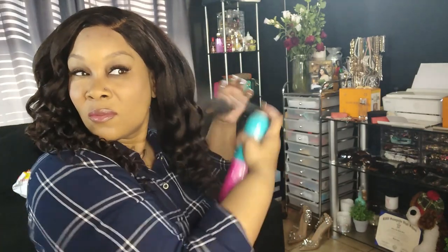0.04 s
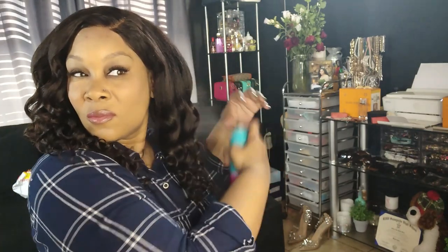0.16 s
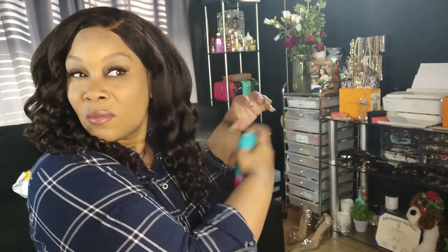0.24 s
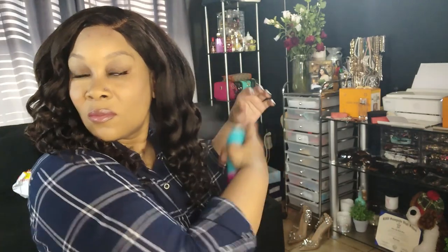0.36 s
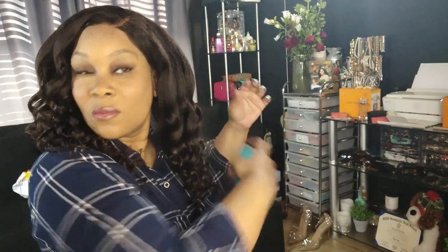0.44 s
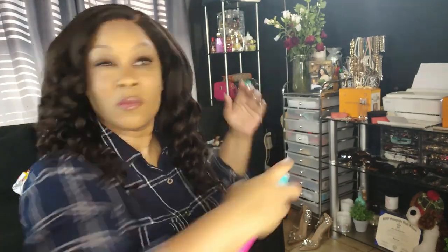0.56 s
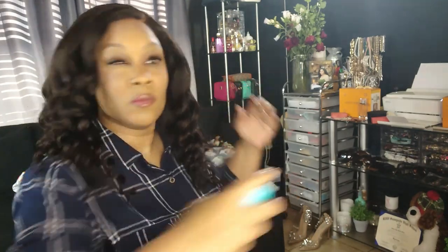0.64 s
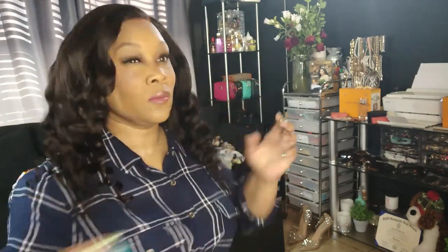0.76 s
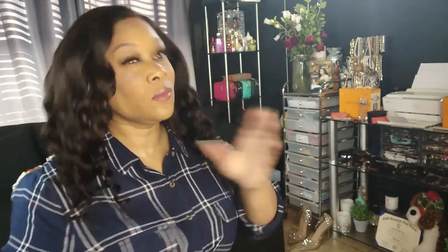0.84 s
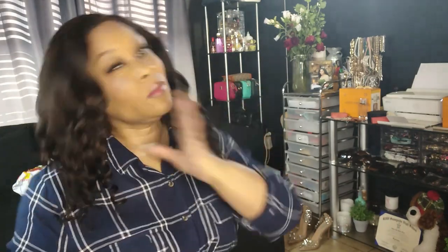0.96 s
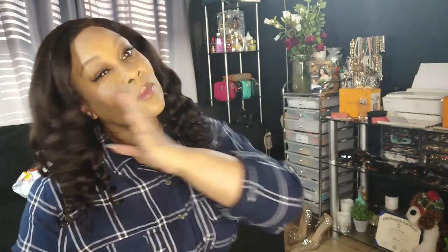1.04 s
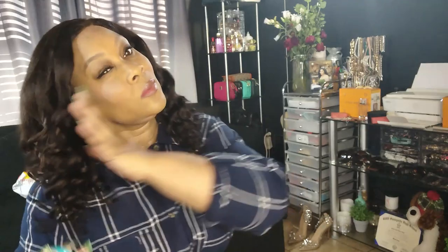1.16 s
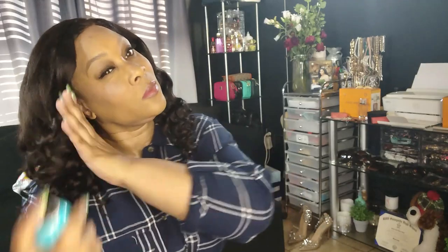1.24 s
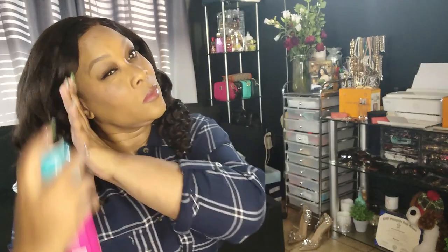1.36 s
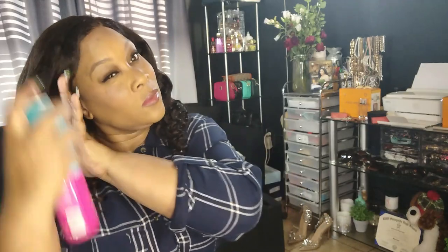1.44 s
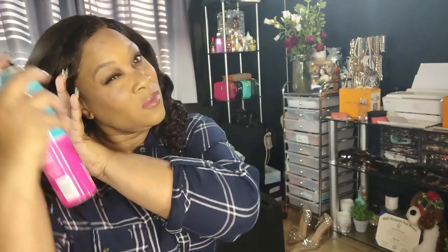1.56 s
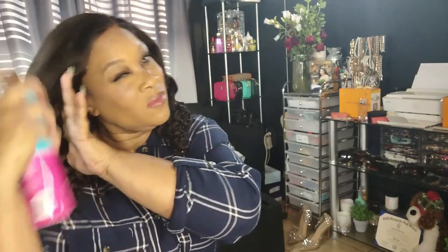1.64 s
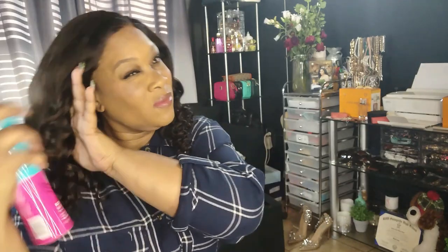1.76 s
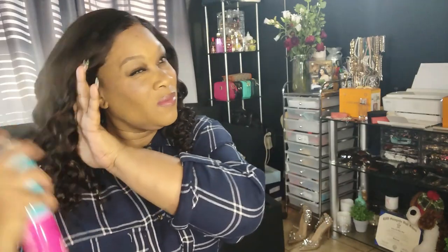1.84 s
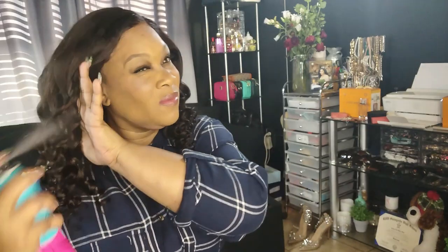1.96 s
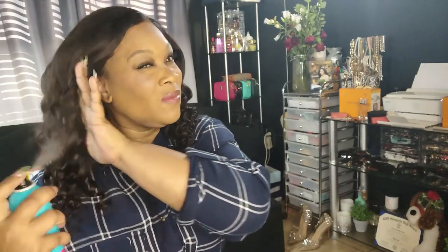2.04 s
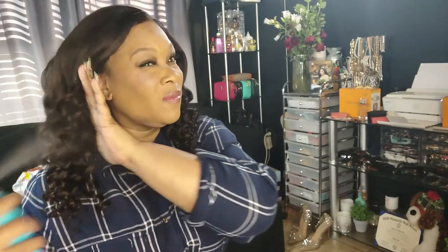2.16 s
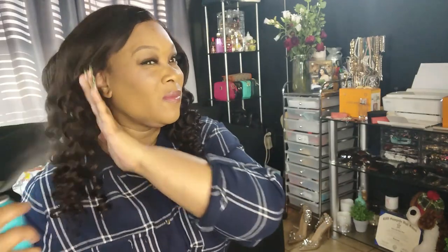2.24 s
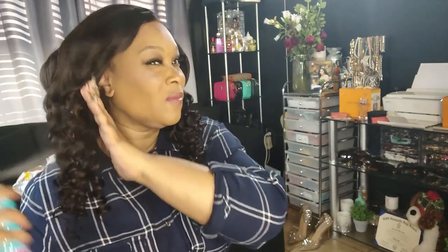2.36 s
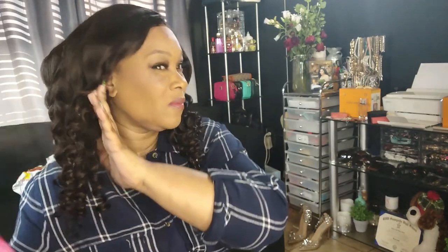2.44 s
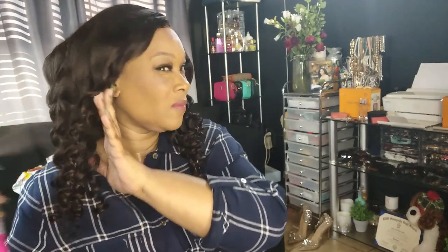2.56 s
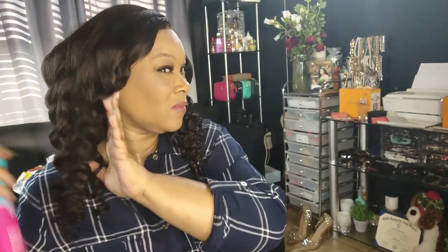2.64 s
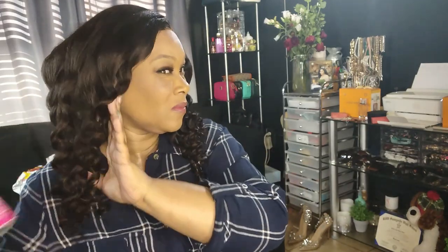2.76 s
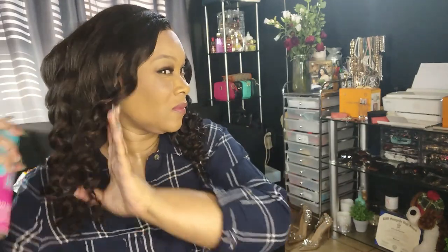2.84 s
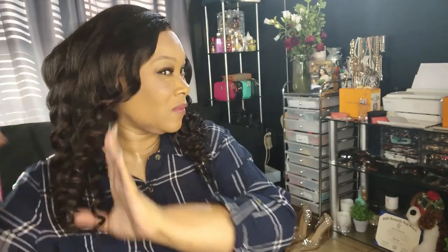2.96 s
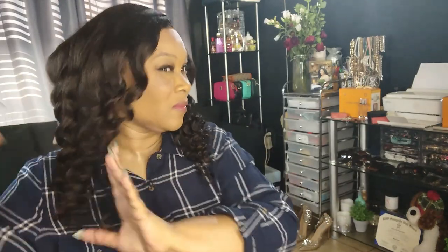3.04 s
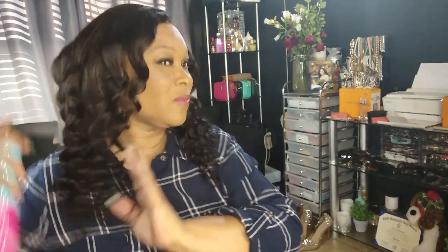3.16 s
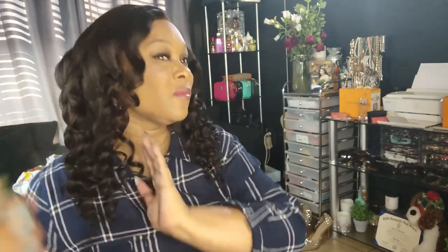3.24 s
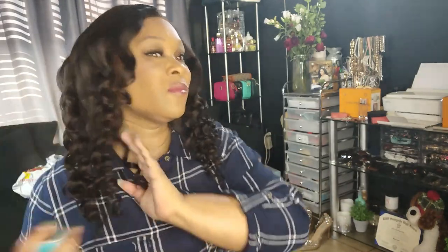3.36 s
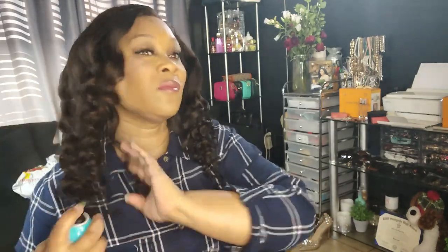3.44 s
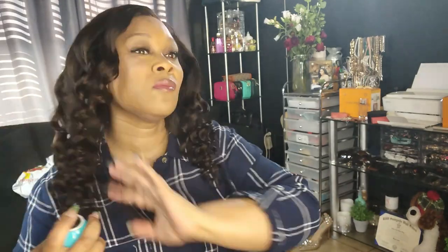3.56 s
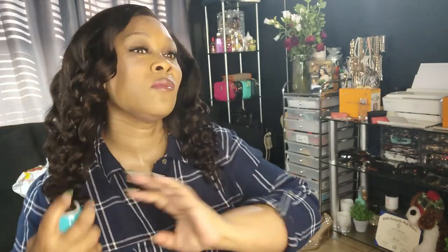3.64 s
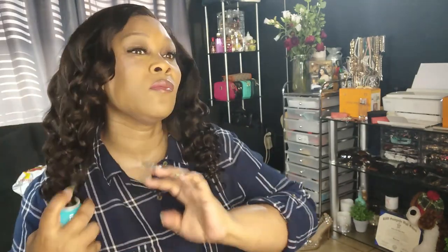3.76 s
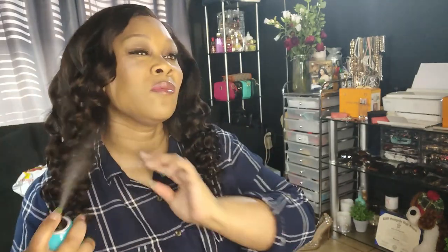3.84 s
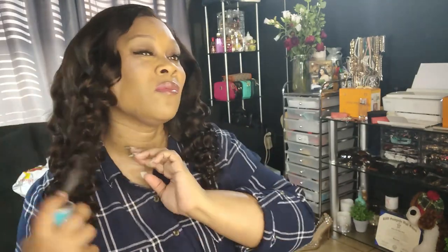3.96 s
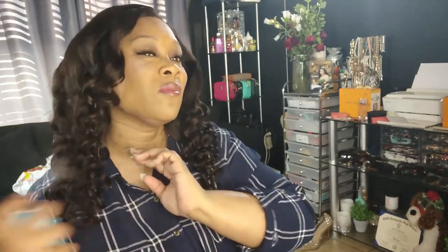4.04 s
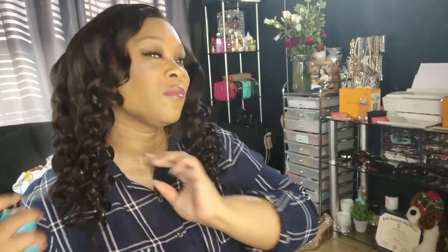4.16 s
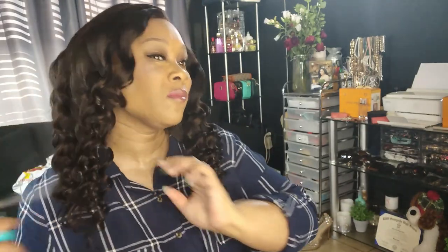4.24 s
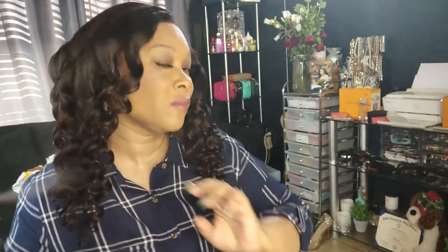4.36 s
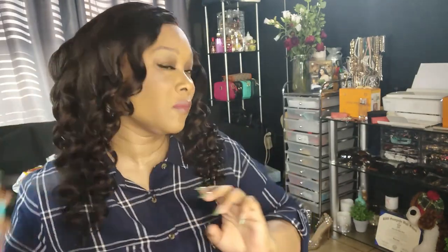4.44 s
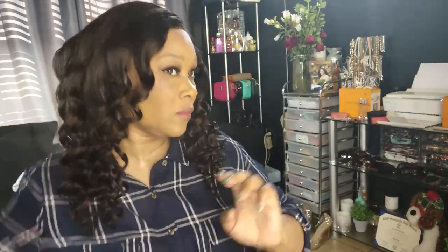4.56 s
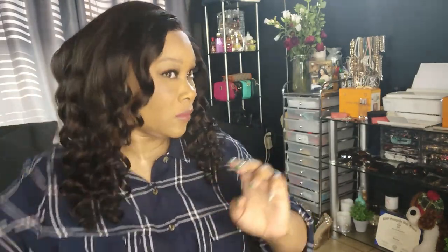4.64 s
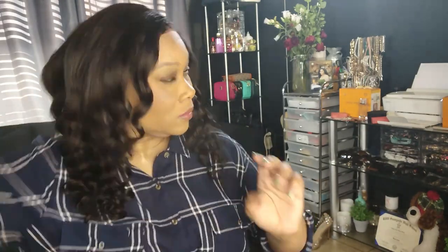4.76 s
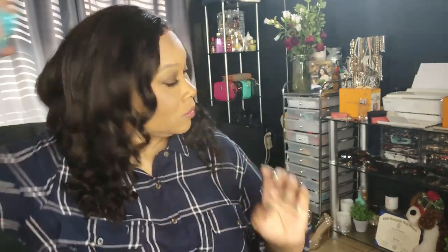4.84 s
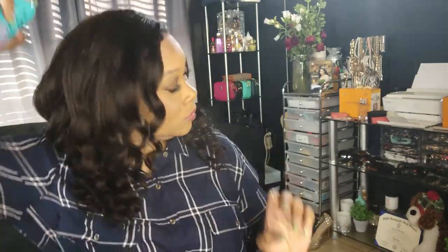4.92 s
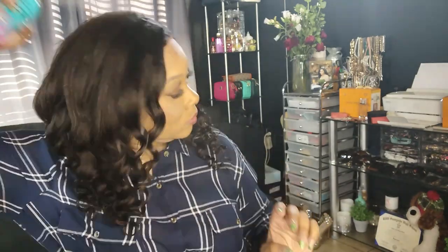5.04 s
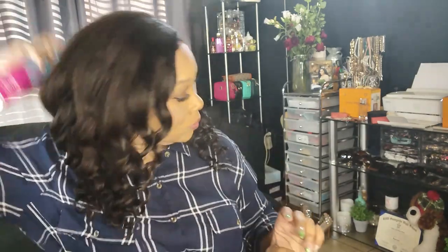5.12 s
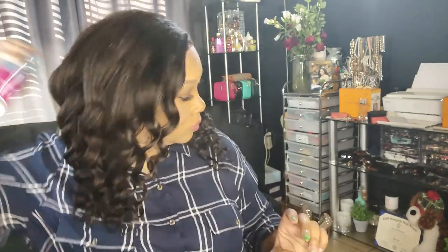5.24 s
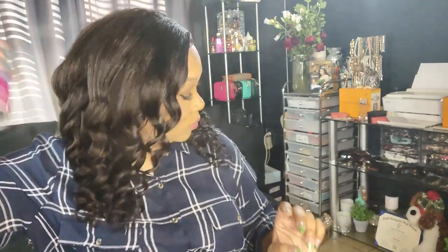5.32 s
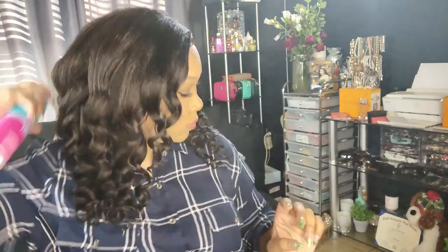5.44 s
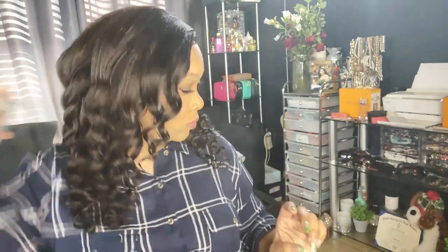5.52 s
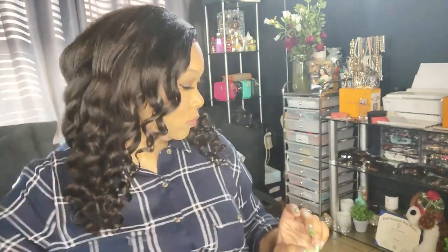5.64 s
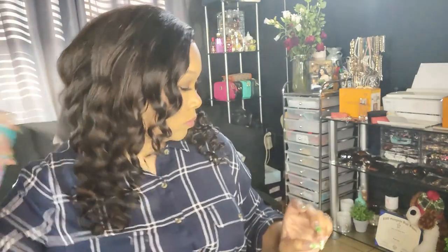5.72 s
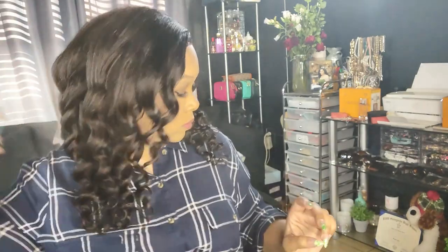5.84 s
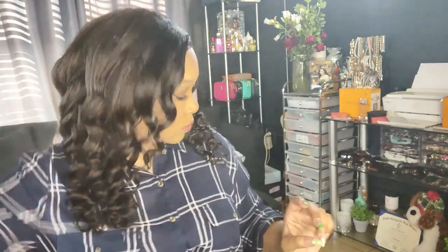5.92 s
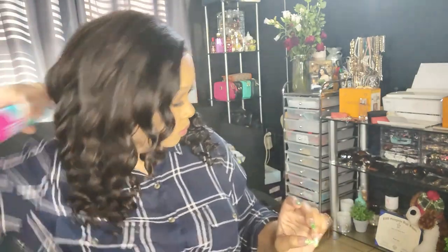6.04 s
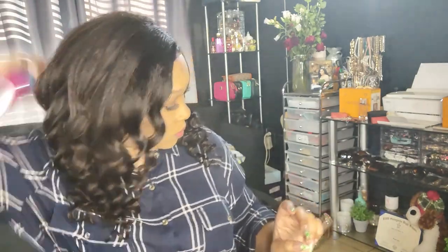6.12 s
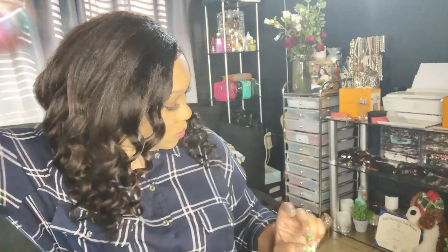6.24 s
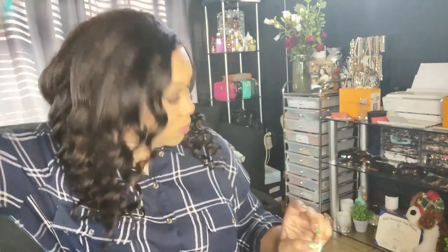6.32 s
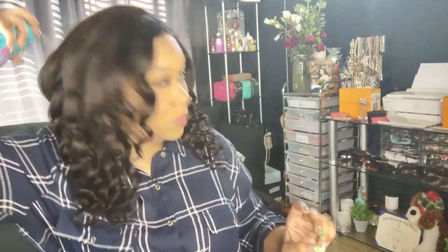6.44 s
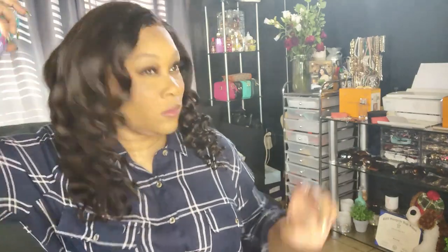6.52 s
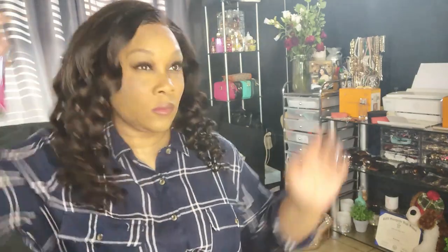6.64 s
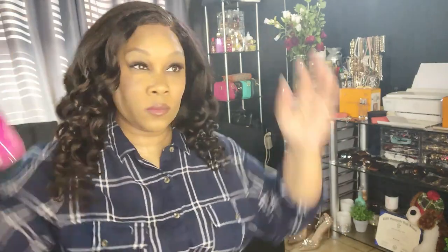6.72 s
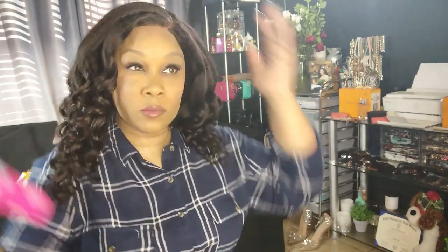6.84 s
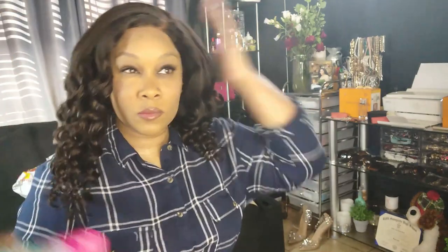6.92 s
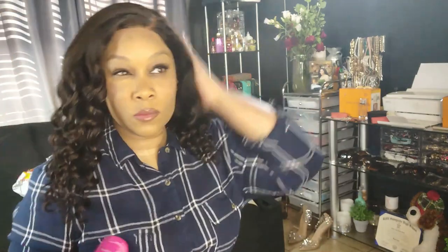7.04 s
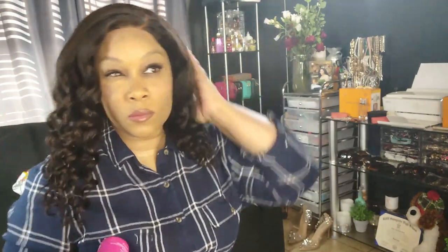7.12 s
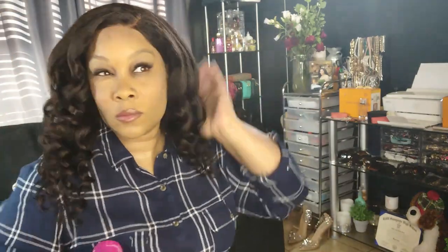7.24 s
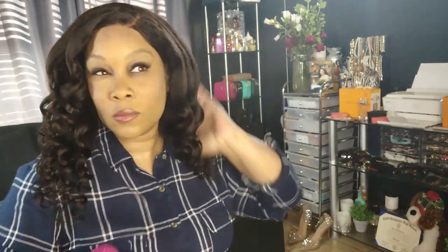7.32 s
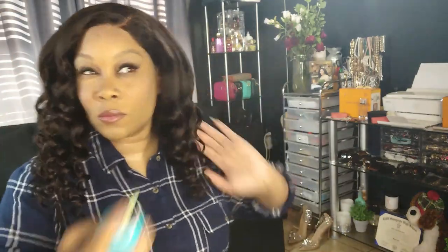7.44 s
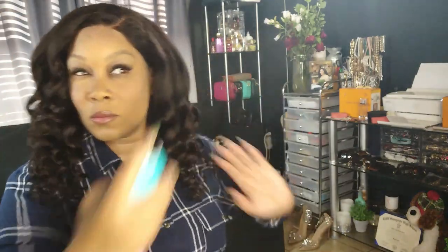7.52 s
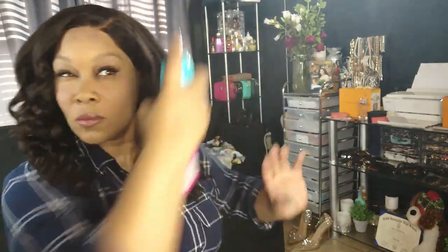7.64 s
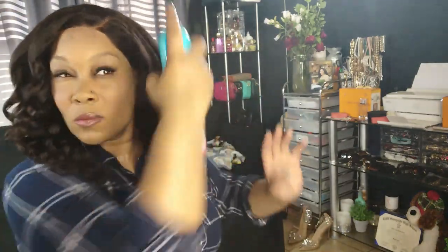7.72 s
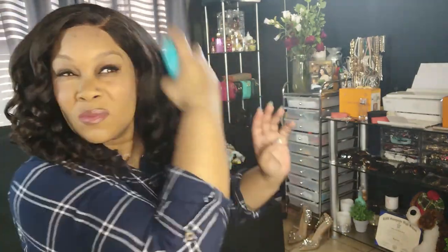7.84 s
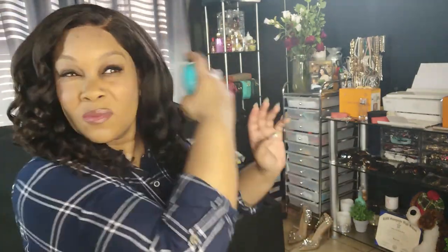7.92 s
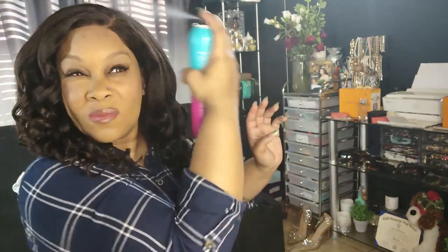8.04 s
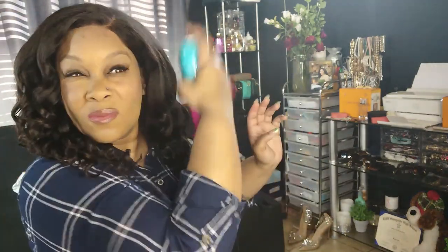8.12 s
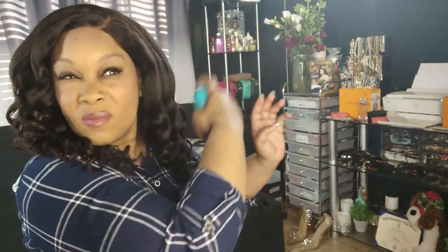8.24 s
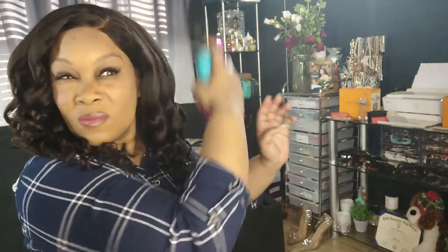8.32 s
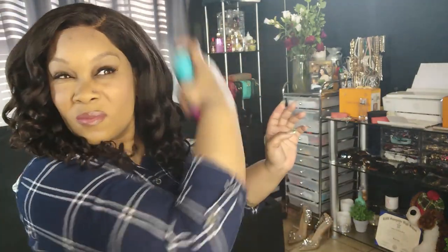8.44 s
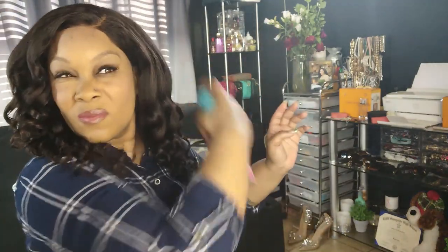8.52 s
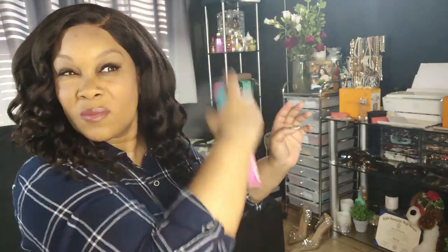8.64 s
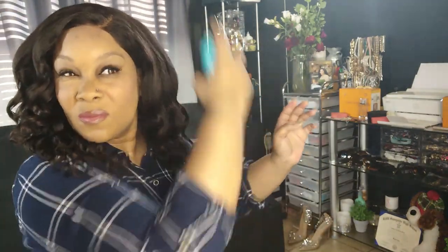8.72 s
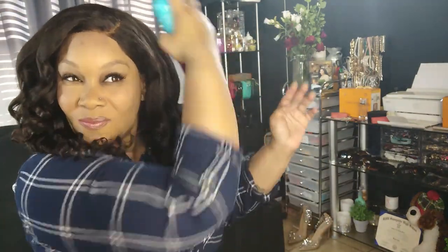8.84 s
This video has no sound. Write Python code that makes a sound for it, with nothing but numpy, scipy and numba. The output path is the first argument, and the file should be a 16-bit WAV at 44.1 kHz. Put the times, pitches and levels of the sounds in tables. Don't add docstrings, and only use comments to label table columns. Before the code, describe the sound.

A sharp aerosol hiss is already running and snaps off at about 0.55 s. Soft thuds of hands and can follow at 0.85 and 1.1 s, with a small nail tap at 1.2 and rustling cloth. At 1.65 s a slow leak swells into a strong hiss, dips around 2.8, is pressed again and ends near 3.3. After rustling, a third burst runs from 3.9 to 4.65 s. The fourth opens at about 5.1, with bumps at 5.3 and 5.55, weakens near 6.2, surges again and stops at 6.6. A crisp click on the can comes at 7.1, then light thuds around 7.8. The last burst grows from 7.95 to its strongest near 8.7, with knocks beneath, and shuts at 8.8. The hiss is bright and slightly sputtering, with a faint hollow whistle; low hum and short room echoes surround it, right side brighter.

```python
import sys
import numpy as np
from scipy import signal
from scipy.fft import rfft, irfft
from scipy.io import wavfile
from scipy.ndimage import uniform_filter1d, map_coordinates
from numba import njit

SR = 44100
rng = np.random.default_rng(int(sys.argv[2]) if len(sys.argv) > 2 else 0)


def int16_out(signal):
    q = np.round(np.clip(np.atleast_2d(signal).T, -1, 1) * 32767)
    wavfile.write(sys.argv[1], SR, q.astype(np.int16))


def nominal_scale(level):
    x = np.asarray(level, float) / 20
    return 10 ** x


N = 391608


def columns(rows):
    s, *rest = np.transpose(rows)
    return [np.interp(np.arange(N) / SR, s, c) for c in rest]


def at_hz(points, hz):
    table_hz, value = np.transpose(points)
    return np.interp(np.log(hz), np.log(table_hz), value)


def rms_one(x):
    return x / np.sqrt(np.mean(x ** 2) + 1e-20)


def drift(rate):
    r = np.exp(-80 * np.pi * rate / SR)
    noise = rng.standard_normal(N // 40 + 2002)
    slow = signal.lfilter([1], [1, -2 * r, r * r], noise)[2000:]
    return np.interp(np.arange(N) / 40, np.arange(len(slow)), rms_one(slow))


def tinted(x, spectrum):
    hz = np.maximum(np.arange(N // 2 + 1) * SR / N, 10)
    return irfft(rfft(x) * nominal_scale(at_hz(spectrum, hz)), N)


def stereo_noise(spectrum, likeness, lag):
    shared, left, right = rng.standard_normal((3, N))
    share = [(hz, np.clip(c, .001, .999)) for hz, c in likeness]
    shared = tinted(shared, [(hz, 10 * np.log10(c)) for hz, c in share])
    own = tinted(np.array([left, right]), [(hz, 10 * np.log10(1 - c)) for hz, c in share])
    late = map_coordinates(shared, [np.arange(N) - lag], order=1, mode="wrap")
    return rms_one(tinted(own + [late, shared], spectrum))


def band(x, low_hz, high_hz):
    sos = signal.butter(2, [low_hz, min(high_hz, .49 * SR)], "band", fs=SR, output="sos")
    return signal.sosfilt(sos, x)


def below(x, hz, steepness):
    ratio = np.arange(N // 2 + 1) * SR / N / hz
    return irfft(rfft(x) / (1 + ratio ** steepness), N)


@njit
def moving_resonance(x, hz, r):
    y = np.zeros_like(x)
    for i in range(2, len(x)):
        push = (1 - r * r) / 2 * (x[i] - x[i - 2])
        y[i] = push + 2 * r * np.cos(hz[i]) * y[i - 1] - r * r * y[i - 2]
    return y


# (frequency [Hz], level [dB per Hz])
HUM_COLOUR = [(15, -64), (25, -86), (49, -1), (91, -4), (118, 0), (137, -1.5), (158, -12), (233, -11),
              (264, -36), (476, -17), (500, -62), (650, -59), (1100, -120)]
# (frequency [Hz], level [dB per Hz])
RUSTLE_COLOUR = [(120, -49), (200, -26), (240, 1), (268, -5), (535, -5.5), (1110, -7.5), (1430, -8),
                 (1690, -7.5), (15600, -22)]
# (frequency [Hz], likeness [-1 to 1])
BACKGROUND_LIKENESS = [(60, 0.83), (180, 0.49), (550, 0.19), (1650, 0.012), (4970, -0.04), (15000, 0.01)]
# (time [s], level [dB])
ARM_MOVES = [(0.66, -58.5), (1.08, -60), (1.63, -64), (3.4, -58), (3.86, -63.5), (4.72, -61), (4.95, -59.5),
             (6.68, -60), (7.08, -60), (7.51, -65.5), (7.8, -65.5), (7.91, -65)]


def background():
    hum_db, hair_db = -65.5, -14.5
    rustle_db, = columns(ARM_MOVES)
    hum = stereo_noise(HUM_COLOUR, BACKGROUND_LIKENESS, 0) * nominal_scale(hum_db + 1.0 * drift(5.7))
    rustle = stereo_noise(RUSTLE_COLOUR[:-1], BACKGROUND_LIKENESS, 0)
    cloth = below(rustle, 3060, 1.82)
    hair = (rustle - cloth) * nominal_scale(hair_db)
    rustle = cloth * nominal_scale(1.0 * drift(25)) + hair
    return hum + rustle * nominal_scale(rustle_db + 8.0)


def room(x):
    t60_s, move_s = 0.26, 0.35
    t = np.arange(int(.4 * SR)) / SR
    hop = int(move_s * SR)
    x = np.pad(x, ((0, 0), (hop, 2 * hop)))
    out = np.zeros((2, N + 3 * hop + len(t)))
    overlap = np.sin(np.pi * np.arange(2 * hop) / (2 * hop))
    for i in range(0, N + hop, hop):
        tail = rng.standard_normal((2, len(t))) * (t > .003)
        dull = band(tail, 74, 4800)
        bright = tail - dull
        tail = dull * nominal_scale(-60 * t / t60_s) + bright * nominal_scale(-60 * t / (.5 * t60_s) - 0.5)
        tail = tail / np.sqrt(np.sum(tail ** 2) / 2)
        wet = signal.fftconvolve(x[:, i:i + 2 * hop] * overlap, tail, axes=1)
        out[:, i:i + wet.shape[1]] += wet
    return out[:, hop:hop + N]


# (frequency [Hz], level [dB], time to fall 60 dB [s])
FURNITURE = [(130, 0.5, 0.11), (230, -3, 0.11), (330, -8.5, 0.2), (424, -8.5, 0.22), (602, -6, 0.15),
             (983, -25.5, 0.25)]
# (time [s], peak level [dB], centre [Hz],
# time to fall 60 dB [s], width [octaves])
THUDS = [(0.103, -49, 333, 0.053, 0.89), (0.225, -41.5, 130, 0.2, 1.8), (0.734, -49.5, 603, 0.11, 2.5),
         (.863, -34, 513, 0.14, 1.54), (1.107, -39.5, 253, 0.26, 1.7), (1.108, -48, 800, 0.15, 0.7),
         (1.13, -47, 140, 0.47, 0.94), (1.38, -48.5, 136, .15, 0.89), (2.189, -43, 240, 0.11, .9),
         (4.944, -63, 139, 0.069, 0.83), (5.286, -39.5, 494, 0.17, 1.5), (5.55, -41, 810, .4, 1.3),
         (6.13, -52, 130, 0.17, 1.4), (7.782, -47.5, 217, 0.28, 0.96), (7.8, -54, 550, 0.22, .8),
         (7.946, -45, 186, 0.45, 1.35), (8.26, -41, 690, 0.48, 1.7), (8.45, -48, 222, .15, 1),
         (8.56, -40.5, 710, 0.49, 1.4)]
# (time [s], peak level [dB], centre [Hz], time to fall
# 60 dB [s], width [octaves])
RINGS = [
    (1.77, -49, 330, 0.22, 0.31),
    (2.45, -53, 233, 0.22, 0.43),
    (6.67, -53, 130, 0.2, 0.31),
    (7.044, -65, 130, 0.09, .6),
    (7.1, -54, 1600, 0.07, 0.26),
    (7.99, -47, 950, 0.62, 0.26),
    (8.798, -50, 132, 1.2, 0.31),
]
# (time [s], peak level [dB], centre [Hz], time to fall 60 dB [s], width [octaves])
TICKS = [
    (.866, -50, 4900, .12, 0.7),
    (1.203, -49, 3480, 0.12, 0.84),
    (4.92, -66, 5170, 2.5, .04),
    (7.1, -42.5, 2700, 0.037, 0.51),
    (7.1, -46.5, 5800, 0.041, 0.29),
    (7.1, -50, 4030, 0.04, 0.24),
    (7.101, -41, 11000, 0.086, 0.95),
    (7.109, -53, 9000, 0.033, 1.8),
    (7.45, -62, 3500, .4, 1.5),
]


def knocks():
    out = np.zeros((2, N))
    t = np.arange(SR // 2) / SR
    kinds = [(THUDS, .5), (RINGS, 4), (TICKS, -10.5)]
    blows = [(*row, pan_db) for rows, pan_db in kinds for row in rows]
    for s, level_db, hz, t60, octaves, pan_db in blows:
        low_hz, high_hz = hz * 2 ** (-octaves / 2), hz * 2 ** (octaves / 2)
        fade = nominal_scale(-60 * t / t60) * np.minimum(t * hz / 1.05, 1)
        sound = rms_one(band(rng.standard_normal(len(t)), low_hz, high_hz)) * fade
        for mode_hz, mode_db, mode_t60 in FURNITURE:
            reach = np.exp(-(np.log2(mode_hz / hz) / (0.79 * octaves)) ** 2)
            ring = np.sin(2 * np.pi * mode_hz * t) * nominal_scale(-60 * t / np.sqrt(mode_t60 * t60))
            sound = sound + nominal_scale(mode_db + 4.0) * reach * ring * np.minimum(t / 0.005, 1)
        port_gain = nominal_scale(level_db + np.array([[.5], [-.5]]) * pan_db)
        knock = port_gain * sound / np.max(np.abs(sound))
        i = round(s * SR)
        out[:, i:i + len(t)] += knock[:, :N - i]
    return out


# (time [s], flow level [dB])
PRESSES = [
    [(0.0, -35.5), (0.3, -34.5), (0.514, -36), (0.546, -36)],
    [(1.638, -66), (1.665, -53), (1.793, -44.5), (2.017, -37), (2.491, -34), (2.607, -36.5), (2.723, -34.5),
     (2.807, -39)],
    [(2.845, -59), (2.865, -49.5), (2.933, -32), (3.049, -35.5), (3.121, -39.5), (3.295, -36.5)],
    [(3.869, -67), (3.877, -57.5), (3.957, -38.5), (4.145, -33.5), (4.455, -33), (4.549, -37),
     (4.635, -37.5)],
    [(5.085, -55), (5.097, -48), (5.14, -38.5), (5.5, -35), (5.71, -31.5), (5.934, -40), (6.062, -37.5),
     (6.176, -42)],
    [(6.308, -37), (6.436, -33), (6.558, -32), (6.584, -42.5)],
    [(7.92, -65), (7.949, -46), (8.193, -35), (8.241, -34), (8.285, -33), (8.489, -36), (8.601, -31),
     (8.715, -30), (8.789, -38.5)],
]


def valve():
    shut_s, shut_db = 0.026, -81
    dribble_s, dribble_db = 0.055, -75
    rows, t, pressed = [], np.arange(N) / SR, np.ones(N)
    for press, following in zip(PRESSES, PRESSES[1:] + [[(N / SR + 1, 0)]]):
        rows += press
        shut, next_s = press[-1][0] + shut_s, following[0][0]
        if next_s > shut + 4 * dribble_s:
            rows += [(shut, shut_db), (shut + dribble_s, dribble_db)]
            pressed[(t > shut + dribble_s) & (t < next_s)] = 0
    travel, = columns([(s, nominal_scale(db / 2)) for s, db in rows])
    return 40 * np.log10(travel), pressed


def lagging(flow_change_db, level_db, lags, top_db):
    return np.minimum(level_db - lags * flow_change_db, top_db)


# (frequency [Hz], width [Hz], level [dB])
HISS_TONES = [(344, 17, 6), (623, 41, -2.5), (947, 56, 1), (1388, 59, 4), (1810, 14, 8), (2375, 17, 7.5)]


def faint_whistles(hiss):
    out = 0
    for hz, width_hz, level_db in HISS_TONES:
        r = np.exp(-np.pi * width_hz / SR)
        push = [(1 - r * r) / 2, 0, (r * r - 1) / 2]
        ring = signal.lfilter(push, [1, -2 * r * np.cos(2 * np.pi * hz / SR), r * r], hiss)
        out = out + ring * nominal_scale(level_db - 7.5 + 1.1 * drift(0.74))
    return out


# (frequency [Hz], level [dB per Hz])
JET_COLOUR = [(120, -23), (230, -15.5), (270, -21), (320, -13), (600, -12.5), (1200, -12), (2200, -9),
              (2700, -11), (5000, -8), (7000, -7.5), (8600, 17), (10500, 20), (13000, 20.5), (15600, 20)]
# (frequency [Hz], left-right level [dB])
PHONE_SHADOW = [(200, 2), (400, -2), (1300, -0.5), (2400, -1.5), (4400, -5), (6500, -9), (8500, -15),
                (10500, -6.5), (13000, -3.5), (15600, 0.5)]
# (frequency [Hz], share [0 to 1])
DIRECT_SHARE = [(200, 0.95), (700, 0.56), (2000, 0.24), (5000, 0.33), (12000, 0.09)]
# (time [s], left port late by [ms], left-right level [dB])
CAN_BEARING = [(0, 0.068, -1), (.7, .04, -2), (1.6, 0.28, -2.5), (3.2, 0.31, -3.5), (4.4, 0.27, -1.5),
               (5.6, 0.3, -3.5), (6.7, 0.34, -1), (7.9, 0.11, -1.5), (8.88, 0.2, -3)]
# (time [s], frequency [Hz])
VALVE_CAVITY = [(0, 2070), (1.9, 2120), (2.1, 2300), (2.8, 2120), (3.9, 2260), (4.2, 2030), (5.1, 2230),
                (5.55, 1820), (6.1, 2170), (6.5, 1760), (8.3, 1920), (8.88, 1900)]
# (time [s], level [dB])
JET_TURN = [(0, 1.5), (.1, -1.5), (.52, -2), (1.9, 2.5), (2.3, 1.5), (2.75, -1), (3.3, 0), (3.93, 2.5),
            (4.15, 0.5), (4.6, -0.5), (5.2, -0.5), (5.45, 0), (5.7, -1), (6.2, -0.5), (6.45, -1),
            (8.0, -1.5), (8.3, -1), (8.75, -0.5)]


def jet():
    full_flow_db, cavity_width_hz, cavity_db = -35, 283, -1
    flow_db, pressed = valve()
    change_db = flow_db - full_flow_db
    lag_ms, side_db = columns(CAN_BEARING)
    turn_db, = columns(JET_TURN)
    body_db = lagging(change_db, -9, 0.6, 1.5) + turn_db
    rush_db = lagging(change_db, -19.5, 0.71, -10.5) + 0.63 * turn_db
    air_db = lagging(change_db, 3.5, 0.9, 2.5) + 0.29 * turn_db
    pan_db = 0.43 * np.clip(change_db, -5, 5) + side_db

    hiss = stereo_noise(JET_COLOUR, DIRECT_SHARE, lag_ms * SR / 1000)
    left = tinted(hiss[0], [(hz, d / 2) for hz, d in PHONE_SHADOW])
    right = tinted(hiss[1], [(hz, -d / 2) for hz, d in PHONE_SHADOW])
    hiss = np.array([left, right])
    hiss = hiss + faint_whistles(hiss)

    cavity_hz = columns(VALVE_CAVITY)[0] * (1 + 0.06 * drift(12))
    r = np.exp(-np.pi * cavity_width_hz / SR)
    whistle = np.array([moving_resonance(c, 2 * np.pi * cavity_hz / SR, r) for c in hiss])

    under, rush = below(hiss, 7383, 21.6), below(hiss, 1920, 3.2)
    shoulder = below(hiss, 10600, 14.0)
    air = (hiss - shoulder) * nominal_scale(air_db)
    top = rms_one(shoulder - under + air) * nominal_scale(np.outer([.5, -.5], pan_db))
    body = rms_one(under - rush + nominal_scale(cavity_db) * whistle)
    rush = rms_one(rush)

    sputter_db = 0.66 * drift(32)
    layers = top * nominal_scale(0.48 * drift(45))
    layers = layers + body * nominal_scale(body_db + .5 * drift(35))
    layers = layers + rush * nominal_scale(rush_db + 1.25 * drift(6.9))
    return layers * nominal_scale(flow_db + 1.5 + sputter_db) * uniform_filter1d(pressed, size=30)


def scene():
    quiet, hits, spray = background(), knocks(), jet()
    echoes = room(nominal_scale(-5) * spray + nominal_scale(-1.5) * band(hits, 204, 16000))
    return spray + hits + echoes + quiet


def band_limit(x):
    return signal.sosfilt(signal.butter(12, 15945, fs=SR, output="sos"), x)


def record(dry):
    clean = signal.sosfilt(signal.butter(2, 40, "high", fs=SR, output="sos"), dry)
    return band_limit(below(clean, 15945, 900))


dry = scene()
out = record(dry)
int16_out(out)
```